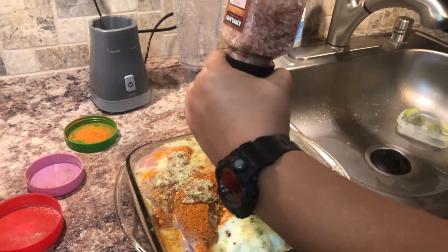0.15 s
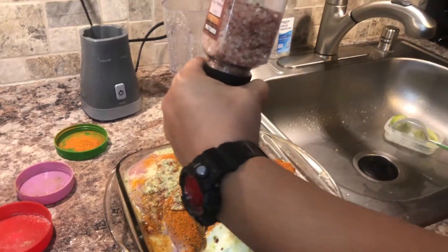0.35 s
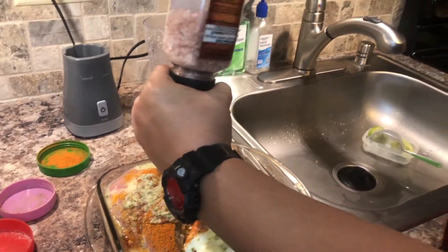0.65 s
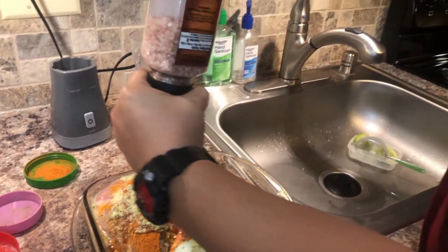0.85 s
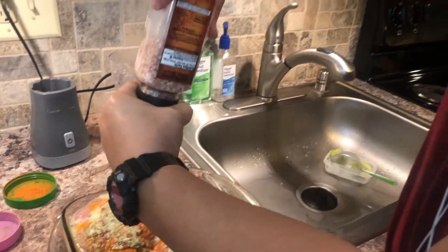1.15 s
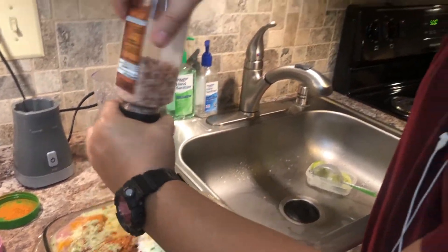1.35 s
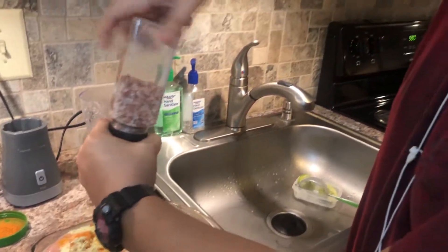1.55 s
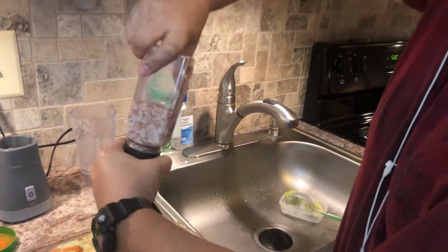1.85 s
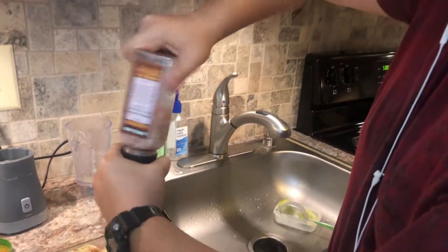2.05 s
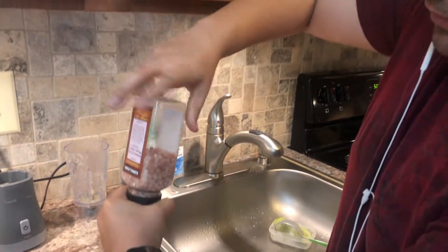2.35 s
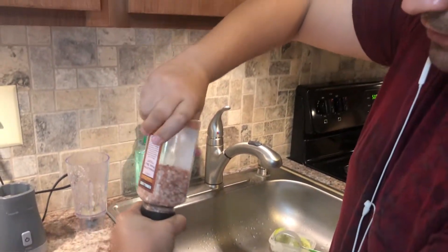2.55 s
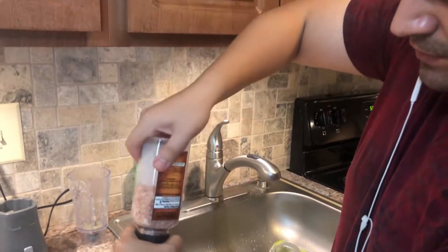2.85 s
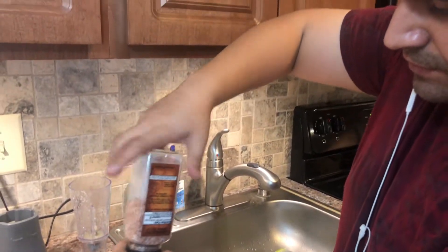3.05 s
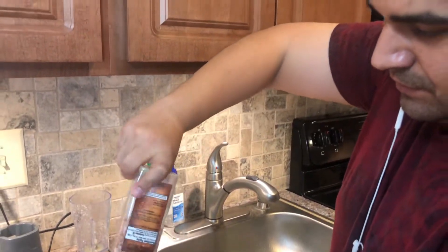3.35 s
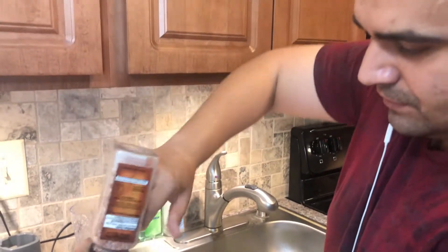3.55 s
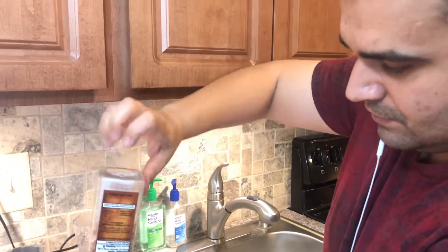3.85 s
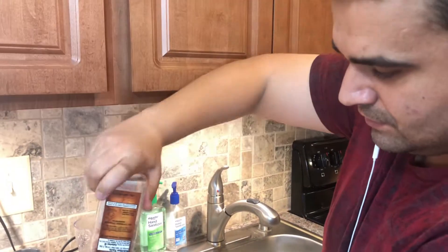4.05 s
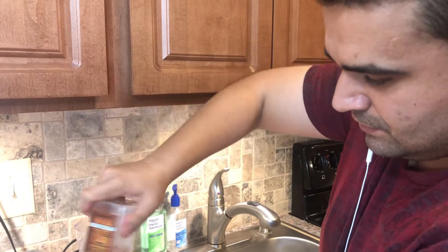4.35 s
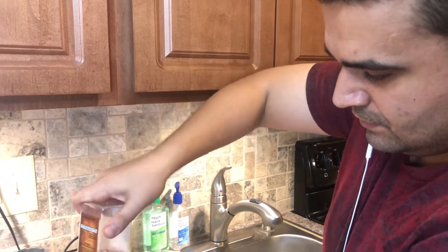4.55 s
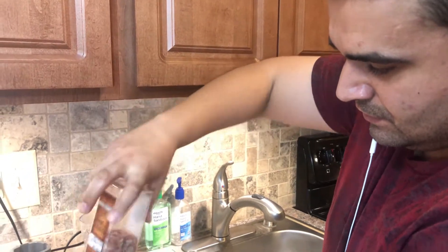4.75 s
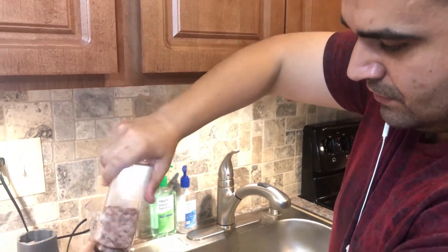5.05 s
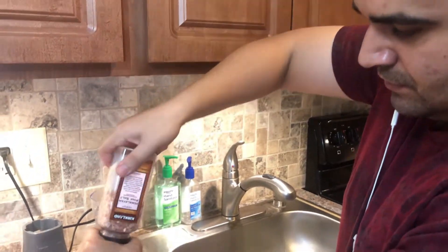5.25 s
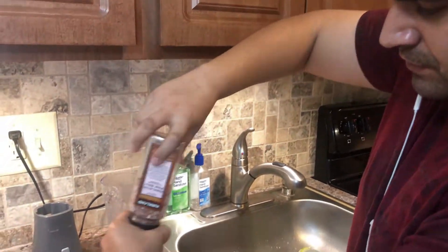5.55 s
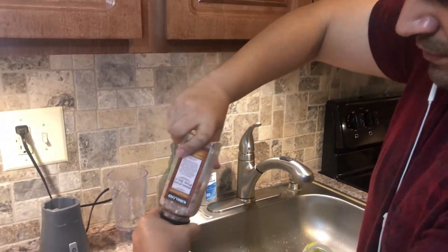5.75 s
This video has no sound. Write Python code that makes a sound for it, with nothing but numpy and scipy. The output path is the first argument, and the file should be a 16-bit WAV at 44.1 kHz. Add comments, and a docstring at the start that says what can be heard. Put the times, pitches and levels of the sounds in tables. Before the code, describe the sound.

Mono, at arm's length in a small tiled kitchen with a short, faint reflection. A plastic salt mill is twisted by hand. It opens mid-stroke with a sharp crunch and hollow knock, then eases to faint grains. A dense gritty crunch comes at 0.6-0.75 s, a crackling run of snaps at 1.25-1.5, and a lighter one near 1.7. At 2.0-2.2 a firm twist crackles with several dull jar knocks, followed by a near pause. Short, crisp crunches fall at 2.7-2.95, then quiet. The longest, loudest grinding swells from 3.4 to 3.8, with the hardest plastic thump around 3.6. Lighter crumbling and small taps follow from 4.0 to 4.9, then a knock and busy crunch at 5.05-5.3, a soft regrip, and a final crunch from 5.8. Loose salt slides softly between strokes; low rumble, faint hum and soft hiss continue underneath.

```python
"""A small tiled kitchen, one mono microphone at arm's length from a plastic salt mill twisted by hand.
Crystals snap and crumble between the burrs, as bursts of crackling noise; grinding swells with each stroke
and loose salt slides softly beneath. The jar wall and its air ring briefly; dull blows swing the jar.
Behind lie a low rumble, a faint hum and a soft hiss, all slowly drifting noise."""
import sys
import numpy as np
from scipy import signal
from scipy.fft import rfft, irfft, next_fast_len
from scipy.io import wavfile
from scipy.ndimage import map_coordinates

SR = 44100
rng = np.random.default_rng(int(sys.argv[2]) if len(sys.argv) > 2 else 0)


def file_out(sig):
    """Save sig as 16-bit WAV at sys.argv[1]."""
    # one column per channel
    cols = np.atleast_2d(sig).T
    # limit, then scale
    lim = np.clip(cols, -1, 1)
    pcm = np.round(lim * 32767).astype(np.int16)
    wavfile.write(sys.argv[1], SR, pcm)


N = 260631

# Room hiss, spectrum shape: (frequency [Hz], relative density [dB])
HISS_SPECTRUM = [(94, -25), (160, -13), (489, -12), (733, -9), (807, -21), (1500, -17), (1620, -19.5),
                 (4230, -24.5), (14800, -27.5), (16000, -24)]
# House rumble, spectrum shape: (frequency [Hz], relative density [dB])
RUMBLE_SPECTRUM = [(11, -48), (20, 5.5), (31, 11), (40, -24), (62, -1.5), (90, -28), (130, -48),
                   (220, -120)]
# House rumble, mean level before its drift: (time [s], level [dB])
RUMBLE_LEVEL = [(.1, -55), (.6, -61.5), (1.3, -52.5), (1.8, -58.5), (2.7, -53), (3.3, -58.5), (5.8, -61)]
# Decay of the tiled room: (frequency [Hz], t60 [s])
KITCHEN_DECAY = [(200, 0.29), (1000, 0.27), (4000, 0.28), (12000, 0.11)]
# Dull blows on the jar, from fingertips and from the mill jerking free; each starts 2.5 ms after its time:
# (time [s], relative level [dB], pitch [Hz], t60 [s])
JAR_BLOWS = [(.038, -15, 720, 0.011), (.175, -39, 750, 0.021), (.583, -20.5, 750, 0.014),
             (.753, -42, 750, .04), (1.077, -32.5, 636, 0.028), (1.238, -42, 850, .04),
             (1.669, -24, 349, 0.018), (1.976, -16.5, 345, 0.021), (2.072, -20, 356, 0.018),
             (2.123, -12.5, 682, 0.012), (2.298, -34.5, 713, 0.017), (2.436, -41, 294, 0.013),
             (2.564, -50, 690, 0.034), (2.606, -40.5, 556, 0.013), (3.281, -42, 770, 0.028),
             (3.6236, -6.5, 483, 0.033), (3.8391, -20, 478, 0.012), (4.217, -44.5, 800, .025),
             (4.246, -40.5, 730, 0.021), (4.278, -44, 810, 0.027), (4.47, -30, 610, 0.032),
             (4.523, -27, 763, 0.018), (4.581, -29, 664, 0.017), (4.796, -32, 307, .011),
             (5.054, -16.5, 800, 0.0092), (5.504, -46, 217, 0.029)]
# Resonances of the jar wall and air: (frequency [Hz], width [Hz], relative level [dB])
JAR_MODES = [(134, 700, -18.5), (314, 101, -4), (476, 155, -4.5), (612.4, 52.6, 3.5), (743, 40.8, 4.5),
             (900, 125, 1.5), (1121, 105, -5), (1246, 111, -6)]
# Rings of the mill head: (frequency [Hz], width [Hz], level over the grit [dB])
HEAD_MODES = [(2300, 300, 4.5), (3440, 280, 7.5), (4130, 590, 1.5), (5424, 210, -3)]
# Grit heard through the mill head, spectrum shape: (frequency [Hz], relative density [dB])
GRIT_SPECTRUM = [(760, -47), (1300, 4), (1970, -8.5), (2870, -2), (4720, -5), (5430, 1.5), (8500, -13.5),
                 (11000, -18), (18700, -120)]
# Sparkle of fractures in the open air, spectrum shape: (frequency [Hz], relative density [dB])
SPARKLE_SPECTRUM = [(4710, -49), (8000, 12), (10900, 9), (12500, 20), (16000, 11.5)]
# Twists of the wrist and easings back for a new grip:
# (start [s], length [s], relative grind level [dB], jar share [dB], relative sparkle share [dB])
STROKES = [(-.1, 0.31, -54.5, 0, 2), (0.215, 0.37, -67.5, 2, -7), (0.567, 0.22, -48.5, 3.5, -1.5),
           (0.876, .3, -63.5, -4, -8), (1.172, 0.43, -59.5, 8, -3), (1.64, 0.31, -60, -5, -2.5),
           (1.964, 0.27, -45.5, 0, -7), (2.263, .36, -80, -22, -12), (2.791, .18, -46, -1.5, -2),
           (3.405, 0.43, -40, -1, 5), (3.792, 0.17, -54, 1.5, -1.5), (3.983, 0.16, -61, -6, -6),
           (4.14, 0.57, -73.5, 3, 0), (4.691, 0.32, -61, 3.5, -4), (5.023, 0.32, -48, -7, -5.5),
           (5.375, 0.39, -62.5, -6, 0), (5.805, 0.21, -50, -7, -10)]
# Crystals that snap:
# (time [s], relative level [dB], relative jar share [dB], crumble t60 [s], ring [Hz])
SNAPS = [(.0354, -17.5, -2.5, 0.088, 3450), (0.0396, -13, -4, 0.064, 3680), (.192, -40.5, -17, 0.07, 2760),
         (.412, -43.5, -4.5, 0.078, 2500), (.4716, -48, -6, .04, 5500), (0.5787, -19, -5, 0.092, 2600),
         (.5924, -17.5, -6, 0.063, 2390), (0.6413, -23, -2, 0.089, 4140), (0.6682, -20.5, -13, 0.046, 3200),
         (.6903, -24, -13.5, 0.059, 3030), (.714, -29, -3, 0.094, 2400), (1.0163, -33.5, -16, 0.058, 2400),
         (1.0909, -41.5, -1.5, .21, 2615), (1.2553, -36, -7.5, 0.075, 5860),
         (1.2692, -21.5, -6.5, 0.043, 2450), (1.2777, -24.5, -12, .1, 4250), (1.29, -35, -1, 0.055, 4180),
         (1.3212, -27, -3, 0.048, 2660), (1.3309, -27.5, -13, 0.079, 4270), (1.3572, -22.5, -9, 0.12, 2180),
         (1.3802, -17, 0, 0.14, 3660), (1.3906, -19, -3, 0.1, 3760), (1.4172, -27, -0.5, 0.12, 4530),
         (1.4589, -26.5, 1, .1, 4400), (1.711, -25, -8, 0.18, 2400), (1.915, -37, 1, 0.14, 4530),
         (1.9211, -33, -3, 0.06, 2400), (1.98, -21, -3.5, 0.059, 2600), (2.001, -30, 0, .1, 2500),
         (2.019, -28, 0.5, 0.1, 4060), (2.0438, -26.5, 0, 0.062, 2500), (2.0736, -30.5, 4, 0.071, 4030),
         (2.0907, -27, -3, 0.081, 2650), (2.1246, -22.5, -3.5, 0.069, 2470),
         (2.1327, -20.5, -7.5, 0.096, 4130), (2.1539, -27, -1.5, 0.044, 2590),
         (2.447, -45, -10, 0.14, 2500), (2.7181, -29.5, -5.5, 0.13, 2640), (2.7465, -30.5, -5, 0.077, 6750),
         (2.803, -18.5, -4, 0.11, 2850), (2.815, -15, -3.5, 0.07, 2660), (2.8766, -27, 3.5, .1, 4100),
         (2.9075, -30, -3, 0.077, 2770), (3.2154, -44.5, -21, 0.11, 3700), (3.4051, -35, -1.5, 0.1, 7140),
         (3.4315, -27.5, 0.5, 0.068, 2380), (3.4651, -27.5, 6, 0.25, 2400),
         (3.4904, -16.5, -14, 0.17, 2380), (3.5296, -26, 2.5, 0.053, 2490), (3.583, -26.5, 7.5, 0.36, 2420),
         (3.6284, -18, -11.5, 0.2, 6400), (3.6411, -18.5, -13, 0.17, 3700),
         (3.6956, -28.5, -16, 0.045, 5360), (3.902, -28.5, -10.5, 0.14, 2280),
         (4.0157, -39.5, -0.5, 0.13, 2380), (4.0589, -36, -10.5, 0.056, 5570),
         (4.0697, -42, -20, 0.036, 5400), (4.355, -32, -0.5, 0.13, 3860),
         (4.3834, -26.5, -0.5, 0.084, 2420), (4.4112, -32, -12, 0.36, 3000),
         (4.4346, -26.5, -0.5, 0.16, 2570), (4.444, -30, -8, 0.057, 4300), (4.5138, -40, 5, 0.2, 2600),
         (4.8046, -31.5, -8.5, 0.11, 2570), (4.8357, -31, -11.5, 0.11, 2500), (4.9017, -38, -9, 0.15, 2520),
         (5.037, -50, -23, 0.081, 4000), (5.0583, -23.5, -6, 0.062, 2570), (5.0766, -27, -2.5, 0.065, 3180),
         (5.1073, -26.5, 0, 0.059, 4130), (5.1237, -25, 3, 0.082, 2400), (5.1398, -27, -8, .1, 2600),
         (5.149, -29.5, -3, 0.086, 2500), (5.1564, -20, -3, .08, 2530), (5.172, -31, -6, .1, 4500),
         (5.185, -30.5, -1.5, 0.093, 2700), (5.2018, -21, -4, .06, 3000), (5.24, -21.5, -4, 0.082, 2570),
         (5.548, -34, -16, 0.1, 2730), (5.812, -43.5, -14, 0.069, 4220), (5.84, -37.5, 2, 0.38, 4180),
         (5.8625, -19.5, 0.5, 0.099, 2780), (5.891, -25.5, -14, 0.034, 2460)]
# Rings of the small grains: (frequency [Hz])
TICK_RINGS = 2580, 2550, 3800, 5300

TOP_HZ = 15750  # band limit of the recorder
WET_DB, PREDELAY = -13, SR // 200  # room answer; delay in samples

# blows on the jar
HARD_T60_S = .02  # blows that ring longer are softer: less clack and shove
CLACK_DB, CLACK_GROWS = 5, 0.64  # over the swing at -40 dB; dB gained per dB of swing
SHOVE_DB, SHOVE_GROWS = -31, .15  # likewise: hard blows shove hardly more than soft ones
RATTLE_DB, RATTLE_T60_S = -15, .04  # over the swing at -40.5 dB; grows like the clack

# strokes and the salt that settles between them
SWELL_POWER = 2.4  # power of the half-sine swell
REST_DB, REST_JAR_DB = -77, -70  # relative levels of loose salt, head and jar
GRIND_SPARKLE_DB = -11.5  # sparkle relative to the grind
SCRAPE_HZ, SCRAPE_DB, SCRAPE_T60_S = 2360, -21, .014  # level relative to a light grind

# small grains that crack over the grind, no louder in hard strokes
TICKS_PER_S, TICK_T60_S = 70, .028
TICK_DB, TICK_SPREAD_DB = 5, 7.5  # least level over the grind; random extra, at most
TICK_TOP_DB = -62  # grind level above which ticks and scrape stop growing
TICK_JAR_DB = -20, 0  # range of the relative jar share

# crystals
SPLIT, SNAP = .4, .15  # first split and click over the crumbling, for a crumble t60 of 1 s
SNAP_T60_S, RING_T60_S = .008, .0038
SNAP_SPARKLE_DB = -25.5  # share in the open air, before that of the stroke


def amp(db):
    """dB to gain."""
    return 10 ** (np.asarray(db) / 20)


def unit(x):
    """Scaled to rms 1."""
    return x / np.sqrt(np.mean(np.abs(x) ** 2) + 1e-20)


def along(points, hz):
    """(Hz, value) points read along a log frequency axis."""
    f, v = np.transpose(points)
    return np.interp(np.log(hz + 1), np.log(f + 1), v)


def wobble(rate):
    """A smooth random curve, rate knots a second."""
    knots = rng.standard_normal(int(N * rate / SR) + 4)
    return map_coordinates(knots, [np.arange(N) * rate / SR])


def filtered(x, response):
    """x times a complex response of frequency."""
    m = next_fast_len(N + SR // 2)
    return irfft(rfft(x, m) * response(np.fft.rfftfreq(m, 1 / SR)), m)[:N]


def modes(table, f):
    """Causal resonances of alternating sign."""
    total = 0
    for k, (center, width, db) in enumerate(table):
        resonance = 1j * f * width / (center * center - f * f + 1j * f * width)
        total = total + (-1) ** k * amp(db) * resonance
    return total


def causal(points, f):
    """Minimum-phase response with the gain of the (Hz, dB) points, no lower than -50 dB."""
    cepstrum = irfft(np.log(amp(np.maximum(along(points, f), -50))))
    cepstrum[1:len(f) - 1] *= 2  # fold the part before zero onto the part after
    cepstrum[len(f):] = 0
    return np.exp(rfft(cepstrum))


def crackle(count, spread_db):
    """White noise in which single tiny fractures stand out, rms 1."""
    return unit(rng.standard_normal(count) * amp(spread_db * rng.exponential(size=count)))


def shaped_noise(response):
    """Steady white noise coloured by a response, rms 1."""
    return unit(filtered(rng.standard_normal(N), response))


def room_tone():
    """House rumble, a fuzzy appliance hum and faint hiss: coloured noises whose levels drift."""
    rumble_db = np.interp(np.arange(N) / SR, *np.transpose(RUMBLE_LEVEL)) + 3.2 * wobble(3.6)
    rumble = amp(rumble_db) * shaped_noise(lambda f: amp(along(RUMBLE_SPECTRUM, f)))
    hum_db = -73.5 + 1.47 * wobble(12)
    hum = amp(hum_db) * shaped_noise(lambda f: modes([(116.0, 8.5, 0)], f))  # 116 Hz, 8.5 Hz wide
    hiss_db = -66.5 + 0.37 * wobble(13)
    hiss = amp(hiss_db) * shaped_noise(lambda f: amp(along(HISS_SPECTRUM, f)))
    return rumble + hum + hiss


def kitchen(x):
    """Tiles and worktop answer with a tail of decaying noise, drawn anew each quarter second."""
    out, step = np.zeros(N + 2 * SR), SR // 4
    for k in range(0, N, step):
        hz, t, z = signal.stft(rng.standard_normal(SR // 2), SR, nperseg=256)
        decay = amp(-60 * t / along(KITCHEN_DECAY, hz)[:, None])
        tail = signal.istft(z * decay, SR, nperseg=256)[1]
        wet = signal.fftconvolve(x[k:k + step], tail / np.linalg.norm(tail))
        out[k + PREDELAY:][:len(wet)] += wet
    return out[:N]


def taps():
    """A blow swings the damped jar wall for a few cycles, clacks dully, shoves the jar and rattles the salt."""
    out = np.zeros(N + SR)
    t = np.maximum(np.arange(SR // 5) / SR - .0025, 0)  # every blow starts 2.5 ms after its listed time
    shove = (1 - t / 0.0029) * (t / 0.00087) * np.exp(-t / 0.0014)
    clack = (1 - t / 0.00043) * (t / 0.00023) ** 2 * np.exp(-t / 0.000073)
    for s, db, hz, t60 in JAR_BLOWS:
        onset = (1 - np.exp(-t / (0.088 * t60))) ** 2
        swing = onset * amp(-60 * t / max(t60, .008)) * np.sin(2 * np.pi * hz * t)
        salt = np.convolve(rng.standard_normal(len(t)), np.hanning(48) / 4, 'same')
        rattle = salt * (t > 0) * amp(-60 * t / RATTLE_T60_S)  # salt jumps inside
        hardness = (HARD_T60_S / t60) ** 2
        clack_db = CLACK_DB + (CLACK_GROWS - 1) * (db + 40)
        shove_db = SHOVE_DB + (SHOVE_GROWS - 1) * (db + 40)
        rattle_db = RATTLE_DB + (CLACK_GROWS - 1) * (db + 40.5)
        contact = hardness * (amp(clack_db) * clack + amp(shove_db) * shove)
        blow = swing + contact + amp(rattle_db) * rattle
        out[round(s * SR):][:len(t)] -= amp(db + 3.0) * blow
    return out[:N]


def strokes():
    """Half-sine swells of grinding: level in dB at the mill head and in the jar, and sparkle share in dB."""
    t = np.arange(N) / SR
    start, length, db, jar_db, sparkle_db = np.transpose(STROKES)[:, :, None]
    progress = np.clip((t - start) / length, 0, 1)
    swells = amp(db) * np.abs(np.sin(np.pi * progress)) ** SWELL_POWER
    grit_db = 20 * np.log10(amp(REST_DB) + swells.sum(0))
    wall_db = 20 * np.log10(amp(REST_JAR_DB) + (swells * amp(jar_db)).sum(0))
    bright_db = np.interp(t, (start + length / 2)[:, 0], sparkle_db[:, 0])
    return grit_db, wall_db, bright_db


def ticks(grit_db):
    """Small grains crack at random moments, following the grind up to a cap; rows like the snaps."""
    draw = rng.random((600, 4))
    times = np.cumsum(-np.log(draw[:, 0])) / TICKS_PER_S
    rows = []
    for s, strength, pitch, share in zip(times, *draw.T[1:]):
        if s * SR < N - 1:
            grind_db = min(grit_db[int(s * SR)], TICK_TOP_DB)
            db = grind_db + TICK_DB + TICK_SPREAD_DB * strength
            jar_db = np.interp(share, [0, 1], TICK_JAR_DB)
            rows.append((s, db, jar_db, TICK_T60_S, TICK_RINGS[int(pitch * len(TICK_RINGS))]))
    return rows


def scraping(grit, grit_db):
    """Light strokes scrape the burr into a short decaying tone, which grows no further in hard ones."""
    t = np.arange(900) / SR
    light = grit * amp(SCRAPE_DB - np.maximum(grit_db - TICK_TOP_DB, 0))
    tone = np.sin(2 * np.pi * SCRAPE_HZ * t) * amp(-60 * t / SCRAPE_T60_S)
    return np.convolve(light, tone)[:N]


def fracture(t60, hz):
    """A crystal splits, its pieces crumble and it rings: the burst, the jerk on the jar and the ring."""
    t = np.arange(SR // 5) / SR
    snap = SNAP / t60 * amp(-60 * t / SNAP_T60_S)  # a brittle crystal splits at once, a tough one hardly clicks
    crumble = (1 - np.exp(-t / (0.042 * t60))) * amp(-60 * t / max(t60, .01))  # then its pieces are crushed
    envelope = snap + crumble
    burst = envelope * crackle(len(t), spread_db=3.0)
    burst *= np.linalg.norm(envelope) / np.linalg.norm(burst)
    burst[0] = SPLIT / t60  # the first split
    jerk = 0.97 * burst + 0.23 / t60 * np.exp(-t / 0.000096)  # the burr jumps forward and kicks the jar
    tone = np.sin(2 * np.pi * hz * t[:256]) * amp(-60 * t[:256] / RING_T60_S)
    return burst, jerk, np.convolve(burst, tone)[:len(t)]


def forces():
    """Grinding and fracture forces on the mill head, the jar and the open air, and the ringing tones."""
    rough_db = 0.4 * wobble(45) + 1.38 * wobble(160)  # the burrs catch and let go
    grit_db, wall_db, bright_db = strokes()
    levels_db = grit_db, wall_db, grit_db + GRIND_SPARKLE_DB + bright_db
    grinding = [amp(db + rough_db + 0.47 * wobble(30)) * crackle(N, spread_db=3.0) for db in levels_db]
    scrape = scraping(grinding[0], grit_db)
    force = np.pad(grinding + [scrape], ((0, 0), (0, SR)))
    for s, db, jar_db, t60, hz in SNAPS + ticks(grit_db):
        burst, jerk, ring = fracture(t60, hz)
        sparkle_db = SNAP_SPARKLE_DB + bright_db[round(s * SR)]
        parts = [amp(-15) * burst, amp(jar_db - 10.0) * jerk, amp(sparkle_db) * burst, amp(-23.5) * ring]
        force[:, round(s * SR):][:, :len(burst)] += amp(db) * np.array(parts)
    return force[:, :N] * amp(1.7 * wobble(170))  # pieces give way in clumps


def mill():
    """Each force sounds through its own body: resonant head, ringing jar, open air; the tones pass as they are."""
    grit, jar, sparkle, ring = forces()
    head = filtered(grit, lambda f: unit(causal(GRIT_SPECTRUM, f) * (1 + modes(HEAD_MODES, f))))
    wall = filtered(jar, lambda f: unit(modes(JAR_MODES, f)))
    air = filtered(sparkle, lambda f: unit(causal(SPARKLE_SPECTRUM, f)))
    return head + wall + ring + air


def scene():
    """The mill at arm's length from the microphone, the kitchen's answer and the room tone behind it."""
    near = mill() + taps()
    return (near + amp(WET_DB) * kitchen(near) + room_tone())[None]


def record(dry):
    """The mono recorder keeps almost nothing above its band limit."""
    return filtered(dry[0], lambda f: 1 / (1 + (f / TOP_HZ) ** 200))[None]


dry = scene()
out = record(dry)
file_out(out)
```